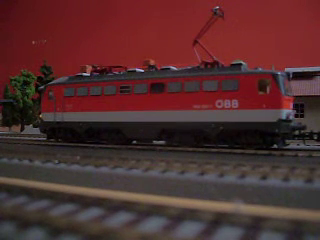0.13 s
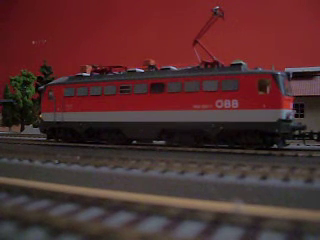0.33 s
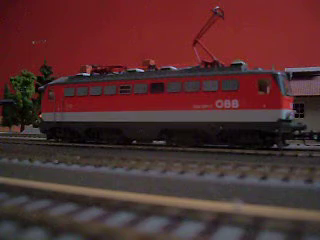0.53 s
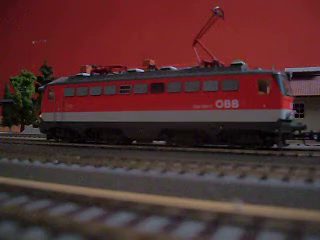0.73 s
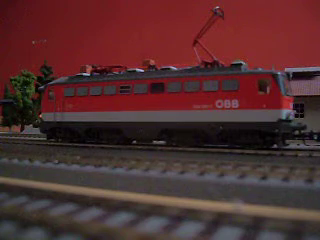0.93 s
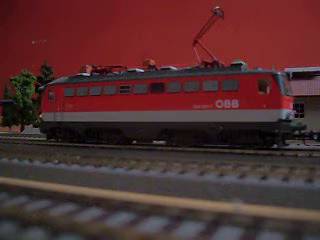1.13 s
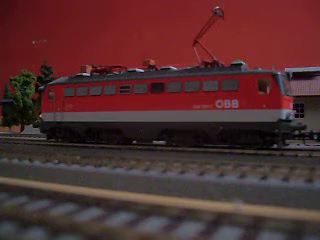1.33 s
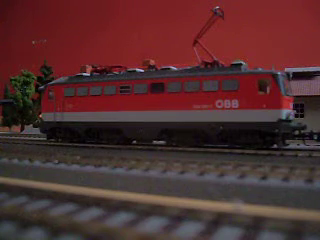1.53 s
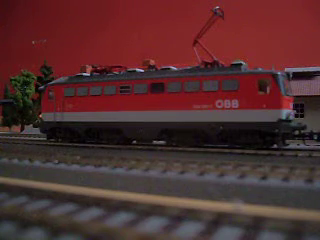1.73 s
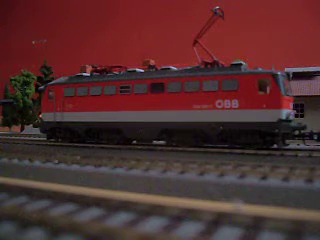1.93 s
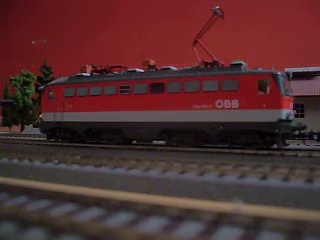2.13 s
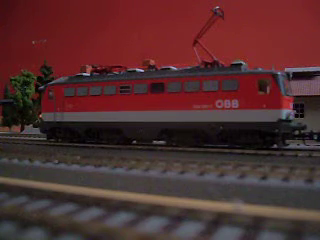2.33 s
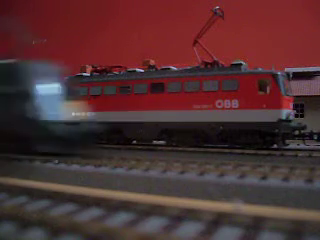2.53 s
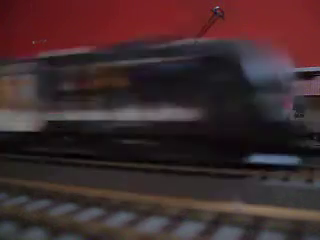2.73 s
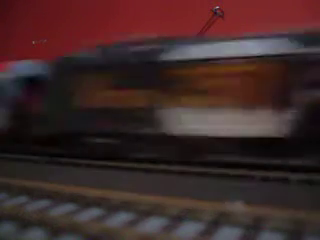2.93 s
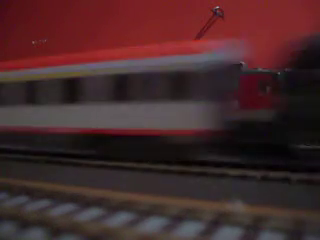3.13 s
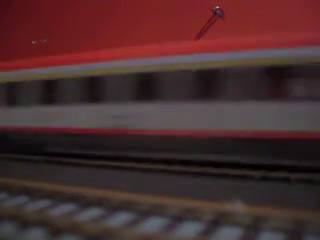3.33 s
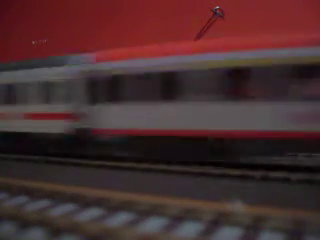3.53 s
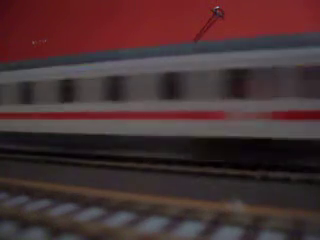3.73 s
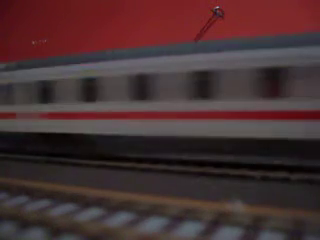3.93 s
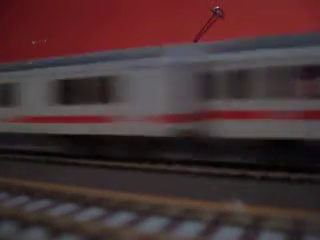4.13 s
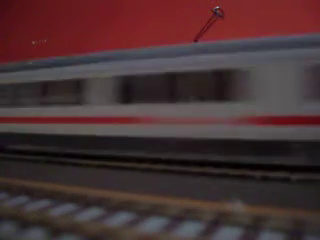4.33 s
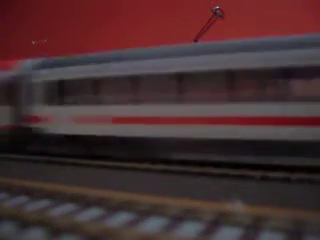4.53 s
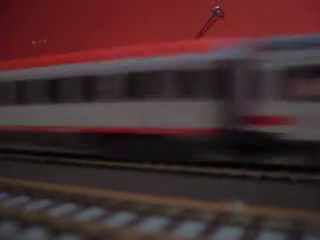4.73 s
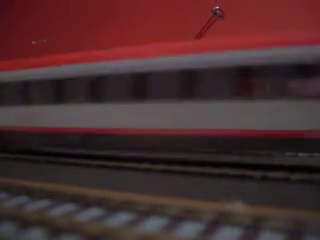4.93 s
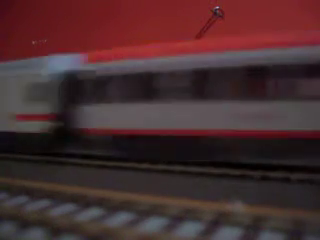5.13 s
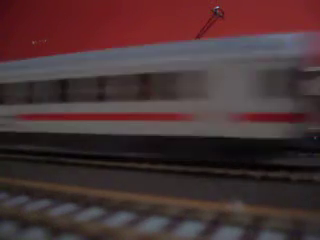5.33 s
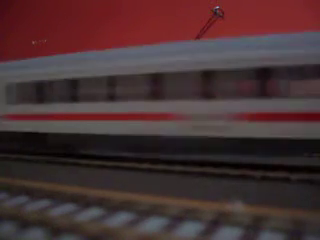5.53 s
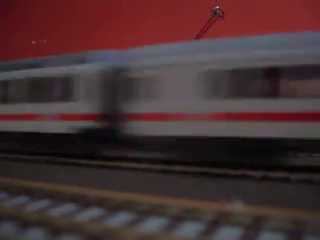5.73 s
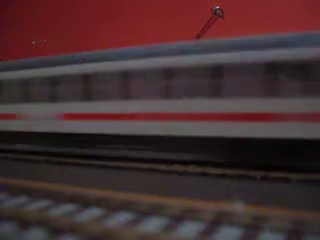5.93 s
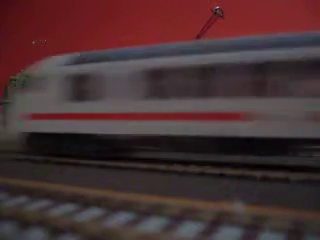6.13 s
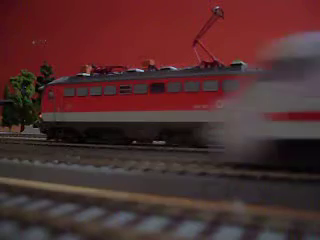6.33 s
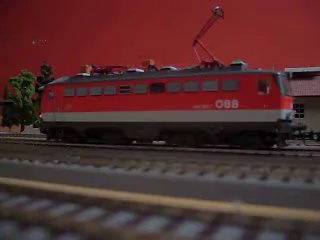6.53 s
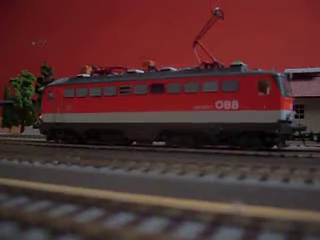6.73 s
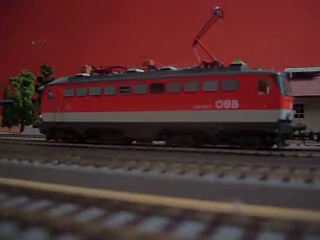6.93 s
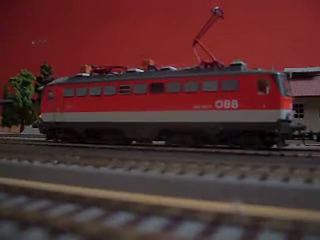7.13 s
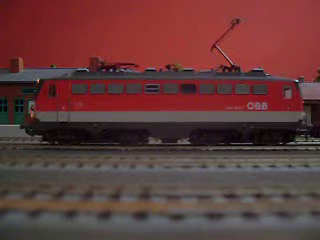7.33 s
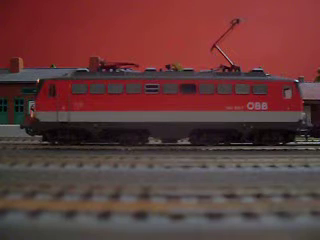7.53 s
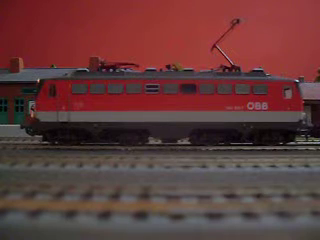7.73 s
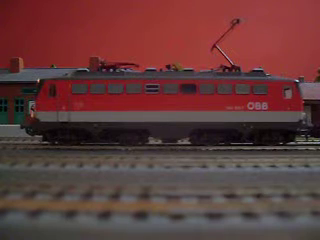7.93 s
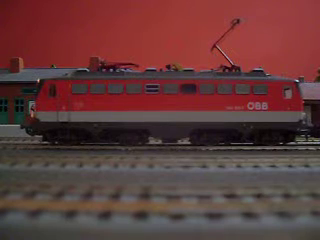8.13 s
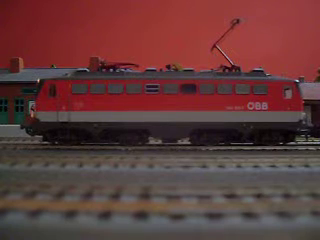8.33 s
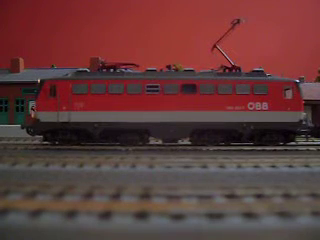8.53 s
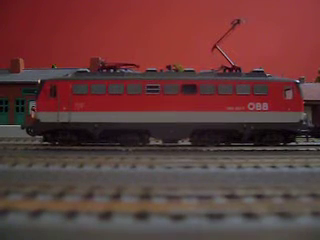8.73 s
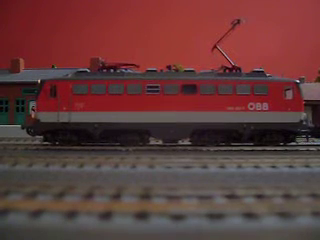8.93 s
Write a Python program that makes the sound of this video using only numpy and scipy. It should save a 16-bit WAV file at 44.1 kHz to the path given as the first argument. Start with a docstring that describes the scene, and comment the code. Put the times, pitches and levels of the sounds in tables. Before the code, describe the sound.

A model train rushes past very close with gritty wheel hiss, rail-joint clacks and ringing rails, then cuts abruptly to faint hiss and whine.

```python
"""On a model railway board, a small train rolls by a few centimetres away: rushing, gritty wheel noise, clacks
and ticks at the rail joints, ringing rails and a rumbling board. At 7.29 s the sound of the train breaks off at
once, leaving faint hiss, soft thuds and a thin electronic whine. Wheels and hiss are shaped noise; ringing
rails are narrow bands of noise; clacks, bumps and thuds are struck, quickly fading tones."""
import sys
import numpy as np
from scipy import signal
from scipy.fft import rfft, irfft
from scipy.io import wavfile

SR = 44100
rng = np.random.default_rng(int(sys.argv[2]) if len(sys.argv) > 2 else 0)


def file_out(sig):
    """Save sig as 16-bit WAV at sys.argv[1]."""
    # one column per channel
    cols = np.atleast_2d(sig).T
    # limit, then scale
    lim = np.clip(cols, -1, 1)
    pcm = np.round(lim * 32767).astype(np.int16)
    wavfile.write(sys.argv[1], SR, pcm)


N = 396900
TIME = np.arange(N) / SR
TRAIN_SOUND_ENDS_S = 7.29
# head and tail of the train go by; each wheel is near for about PASS_S
HEAD_S, TAIL_S, PASS_S = 3.42, 6.71, 0.3
# rolling noise: (steady level from afar dB, level alongside dB, fade after HEAD_S in dB per s)
# the fade follows the lighter rear of the train; other layers use the same three settings
ROLL_DB = (-49, -38.5, 1.47)

# tones of a struck metal wheel: (f/Hz before detuning, relative level/dB, time to fade by 60 dB/s)
TICK_MODES = [(6840, 1.5, 0.003), (9460, 8, 0.0024), (10560, -2, 0.0018)]
# tones of the struck board: (f/Hz, relative level/dB, time to fade by 60 dB/s)
BUMP_MODES = [(113, -15, 0.096), (194, -7, 0.033), (287, -10, 0.041), (390, -7, 0.048), (590, -2, 0.041),
              (730, -1.5, 0.051)]
# tone colour of distant rolling, also used for rustles: (f/Hz, relative level/dB per Hz)
FAR_COLOUR = [(700, -37), (1000, -9.5), (1260, -9.5), (1700, -2), (2580, -1), (3270, 2.5), (3830, -2.5),
              (5580, -3), (7900, -18.5), (9000, -28)]
# a bogie (wheel truck) crosses a rail joint, one axle after the other:
# (t/s, time between axles/s, first clack level/dB, second clack level/dB, level of each tick/dB)
BOGIES = [(3.0034, 0.0685, -28.5, -32, -43), (3.423, 0.058, -39, -31, -39.5), (3.622, 0.063, -31, -37, -41),
          (3.785, 0.057, -31, -29.5, -38), (3.9372, 0.056, -29, -30, -38), (4.1705, 0.057, -29.5, -35, -38),
          (4.2979, 0.060, -30, -31, -37), (4.465, .0515, -30, -34, -39.5), (4.7101, .0612, -35, -35, -39.5),
          (4.8746, .0558, -32, -34, -41), (5.0340, .0596, -32.5, -31.5, -38.3),
          (5.2808, 0.050, -34, -37, -41), (5.408, .0613, -32.5, -32.5, -37.5),
          (5.583, .06, -29.5, -34, -43), (5.821, .06, -33.5, -32.5, -41.5), (5.9620, 0.0592, -34, -30, -41),
          (6.1262, .0572, -29, -31.5, -39), (6.3518, 0.058, -37, -38, -41),
          (6.4915, 0.059, -33.5, -34, -41), (6.8826, .0538, -35, -38, -43.5)]


def from_db(db):
    """Turn decibels into gain."""
    return 10 ** (np.asarray(db) / 20)


def rms_one(x):
    """Scale to an average strength (rms) of 1."""
    return x / np.sqrt(np.mean(x ** 2) + 1e-20)


def in_time(rows):
    """Join the rows with straight lines and read each column at every sample."""
    s, *columns = np.transpose(rows)
    return [np.interp(TIME, s, column) for column in columns]


def colour(x, spectrum):
    """Weight the frequencies of x by a curve that falls 48 dB per octave beyond its ends; rms 1."""
    hz, db = np.transpose(spectrum)
    octave = np.log2(np.arange(N // 2 + 1) * SR / N + 1)
    points = np.log2(hz)
    beyond = np.abs(octave - np.clip(octave, points.min(), points.max()))
    gain = from_db(np.interp(octave, points, db) - 48 * beyond)
    return rms_one(irfft(rfft(x) * gain, N))


def drift(rate):
    """Smooth random wandering with about `rate` changes a second; rms 1."""
    hz = np.arange(N // 8) * SR / N
    real, imaginary = rng.standard_normal((2, len(hz)))
    return rms_one(irfft((real + 1j * imaginary) / (1 + (hz / rate) ** 2), N))


def narrow_noise(centre_hz, width_hz):
    """A tone with randomly wandering strength and phase, like a resonance kept ringing; its pitch may move."""
    phase = 2 * np.pi * np.cumsum(centre_hz * np.ones(N)) / SR
    return rms_one(drift(width_hz) * np.cos(phase) + drift(width_hz) * np.sin(phase))


def ring(force, modes):
    """A struck body: the force sets off several fading tones, each at its own level."""
    out = 0
    for k, (hz, db, t60) in enumerate(modes):
        r = np.exp(-np.log(1000) / (t60 * SR))
        w = 2 * np.pi * hz / SR
        tone = signal.lfilter([0, np.sin(w)], [1, -2 * r * np.cos(w), r * r], force + 1e-18)
        out = out + (-1) ** k * from_db(db) * tone
    return out


def blows(rows):
    """One single-sample click for each (t/s, strength/dB) row."""
    s, db = np.transpose(rows)
    return np.bincount(np.round(s * SR).astype(int), from_db(db), N)


def contact(grains_per_s, spread_db, grain_share, rattle_s):
    """Wheels on rough rail: a smooth rush plus tiny, quickly fading rattles of uneven size; rms about 1."""
    size_db = spread_db * np.minimum(rng.exponential(1, N), 4)
    energy = from_db(size_db) ** 2 * (rng.random(N) < grains_per_s / SR)
    rattles = signal.lfilter([1], [1, -np.exp(-1 / (rattle_s * SR))], energy + 1e-18)
    share = np.clip(grain_share, 0, 1)
    return np.sqrt(share * rattles / rattles.mean() + 1 - share) * rng.standard_normal(N)


def joint_hits(hits, modes, chatter_s, chatter, detune):
    """A knock and a few milliseconds of chatter set a small body ringing; no two hits are quite alike."""
    size = SR // 25
    out = np.zeros(N)
    age = np.arange(size) / SR
    # such a small body gives off no bass and little above the treble
    small_body = signal.butter(2, [480, 13000], "band", fs=SR, output="sos")
    for s, db in hits:
        force = chatter * rng.standard_normal(size) * np.exp(-age / chatter_s)
        force[0] += 1
        detuned = [(hz * np.exp(detune * rng.normal()), level, t60) for hz, level, t60 in modes]
        hit = signal.sosfilt(small_body, ring(force, detuned))
        start = round(s * SR)
        # the level is the rms the hit would have if squeezed into 1 ms
        out[start:start + size] += from_db(db) * hit / np.sqrt(np.sum(hit ** 2) / (SR / 1000))
    return out


def alongside(from_s, to_s, near_s):
    """Power, 0-1, of a row of wheels going by, each fading with the square of its distance."""
    return (np.arctan((TIME - from_s) / near_s) - np.arctan((TIME - to_s) / near_s)) / np.pi


def pass_gains(layer_db):
    """The steady gain of a layer from afar, and its gain as the train goes by."""
    far_db, near_db, fade_db_per_s = layer_db
    faded_db = near_db - fade_db_per_s * np.maximum(TIME - HEAD_S, 0)
    return from_db(far_db), from_db(faded_db) * np.sqrt(alongside(HEAD_S, TAIL_S, PASS_S))


def pass_gain(layer_db, extra=0):
    """Gain of a layer: far, near and any extra part summed in power."""
    far, near = pass_gains(layer_db)
    return np.sqrt(far ** 2 + near ** 2 + extra ** 2)


def hiss(train_on):
    """Faint shaped noise that wavers a little and swells briefly into soft rustles."""
    # tone colour: (f/Hz, relative level/dB per Hz)
    hiss_colour = [(22, -13), (100, -6.5), (200, -7), (280, -7), (430, -4.5), (600, 0), (800, 0.5),
                   (1200, -2), (2300, 0.5), (3500, -2.5), (5000, -3), (7500, -9.5), (10200, -10),
                   (12300, -31.5)]
    # faint rustles: (t/s, time from peak to 1/e of its gain/s, peak level/dB)
    rustles = [(7.33, 0.01, -65), (7.765, .025, -64), (8.07, 0.044, -61)]
    level_db = train_on * -60.5 + (1 - train_on) * -61 + 0.71 * drift(9.2)
    steady = from_db(level_db) * colour(rng.standard_normal(N), hiss_colour)
    rustle_gain = sum(from_db(db) * np.exp(-((TIME - s) / half_s) ** 2) for s, half_s, db in rustles)
    return steady + rustle_gain * colour(rng.standard_normal(N), FAR_COLOUR)


def whine(train_on):
    """A thin electronic tone whose strength and phase jump to and fro 15 times a second."""
    whine_hz, flutter_hz = 7867, 15
    switched = (TIME * flutter_hz) % 1 < .42
    phase = 2 * np.pi * whine_hz * TIME + 1.6 * switched
    pulsing = from_db(-5 * switched)
    level_db = train_on * -77 + (1 - train_on) * -73.2
    return from_db(level_db) * rms_one(np.sin(phase) * pulsing)


def dull_thuds():
    """Clicks set off the deep, dull tones of the board."""
    # thuds: (t/s, strength/dB)
    thuds = [(3.392, -51), (3.458, -56), (3.760, -52), (4.762, -53), (7.598, -61), (7.768, -61),
             (8.61, -62), (8.735, -57)]
    # tones: (f/Hz, relative level/dB, time to fade by 60 dB/s)
    thud_modes = [(105, -11.5, 0.11), (178, -3.5, 0.054), (295, -7.5, .04)]
    return ring(blows(thuds), thud_modes)


def soft_bumps(vary_db):
    """Each bump strikes the board at another spot, so its tones ring in another mix."""
    # bumps: (t/s, strength/dB before the mix varies)
    bumps = [(1.505, -57), (2.206, -49), (2.600, -49), (2.672, -50), (2.831, -52), (3.003, -47),
             (3.075, -50), (3.225, -46), (3.396, -54), (3.471, -43), (3.763, -52), (4.219, -52),
             (5.093, -61), (6.518, -51), (7.1473, -50)]
    s, db = np.transpose(bumps)
    mix_db = vary_db * rng.standard_normal((len(s), len(BUMP_MODES)))
    out = 0
    for k, mode in enumerate(BUMP_MODES):
        out = out + (-1) ** k * ring(blows(np.c_[s, db + mix_db[:, k]]), [mode])
    return out


def track_snap():
    """One sharp snap from the track: a click sets off short tones from bass to treble."""
    # snap: (t/s, strength/dB)
    snap = [(7.1466, -26)]
    # tones: (f/Hz, relative level/dB, time to fade by 60 dB/s)
    snap_modes = [(252, -23.5, 0.026), (520, -10, 0.0053), (1450, -4, 0.0037), (2800, 1, 0.0028),
                  (5900, 2.5, .003), (10500, -9.5, .002)]
    return ring(blows(snap), snap_modes)


def board(judder):
    """The board rumbles and hums under the heavy locomotive and drones under every coach."""
    # tone colours: (f/Hz, relative level/dB per Hz)
    rumble_colour = [(70, -13), (120, -3.5), (200, 1.5), (270, -1), (390, 3.5), (500, 5), (620, -29)]
    drone_colour = [(500, -10), (580, 2), (660, 0), (760, 4), (830, -2.5), (920, 2), (1080, -8),
                    (1350, -18)]
    weight = np.sqrt(alongside(2.8, 3.87, near_s=0.078))  # the locomotive on the board
    shaken = np.sqrt(alongside(BOGIES[0][0], 4.02, near_s=0.022))  # from the first bogie until it settles
    rumble_force = contact(grains_per_s=150, spread_db=0.0, grain_share=0.36, rattle_s=0.0068)
    rumble = colour(rumble_force, rumble_colour)
    drone_force = contact(grains_per_s=240, spread_db=3.0, grain_share=0.45, rattle_s=0.0014)
    drone = colour(drone_force, drone_colour) * from_db(1.47 * judder - 0.87)
    hum = narrow_noise(112, width_hz=6.9)
    # a second resonance, stirred by the distant train
    far_hum = narrow_noise(194, width_hz=9.1) * from_db(-84.5 + 2 * drift(4.3))
    return (rumble * pass_gain((-75, -73, 0), from_db(-67) * weight)
            + drone * pass_gain((-67.5, -54.5, 0.53), from_db(-56) * weight)
            + hum * pass_gain((-92, -82.5, -0.5), from_db(-76.5) * shaken)
            + far_hum)


def singing_track():
    """A broad ring of the rails that sinks as the train leaves, with swells and passing resonances."""
    # swells: (t/s, time from peak to 1/e of its power/s, peak level/dB, f/Hz)
    swells = [(3.58, 0.059, -46, 3580), (4.062, 0.077, -45, 3806), (4.851, 0.038, -46, 4230),
              (5.212, 0.043, -46, 4720), (5.41, 0.044, -45, 4110), (5.621, 0.13, -51, 3590),
              (6.215, 0.1, -48.5, 3600), (6.305, .04, -42, 4000), (6.67, 0.089, -48.5, 3680)]
    # wheels, track and board resonate for a while: (from t/s, to t/s, f/Hz, width/Hz, level/dB)
    rail_rings = [(2.78, 6.95, 9960, 630, -64.5), (2.99, 3.2, 392, 25, -64), (3.0, 3.28, 193.4, 14, -67.5),
                  (3.68, 4.0, 110.5, 6.4, -72), (3.73, 3.86, 2056, 320, -47.5),
                  (3.93, 4.11, 2290, 420, -50), (5.95, 6.56, 700, 140, -62.5), (5.85, 6.33, 5755, 245, -56),
                  (6.55, 7.1, 6740, 324, -59), (7.08, 7.35, 2003, 360, -54.5)]
    sing_hz, sag_from_s, sag_hz_per_s = 3695, 6.7, 950
    centre_hz = sing_hz - sag_hz_per_s * np.maximum(TIME - sag_from_s, 0)
    sing_gain = from_db(-51) * np.sqrt(alongside(5.46, 7.4, near_s=0.066))
    out = sing_gain * narrow_noise(centre_hz, width_hz=480)
    power = sum(from_db(db) ** 2 * np.exp(-((TIME - s) / half_s) ** 2) for s, half_s, db, _ in swells)
    swell_hz, = in_time([(s, hz) for s, _, _, hz in swells])
    out += np.sqrt(power) * narrow_noise(swell_hz, width_hz=460)
    for from_s, to_s, hz, width_hz, db in rail_rings:
        gain = from_db(db) * np.sqrt(alongside(from_s, to_s, near_s=0.013))
        out += gain * narrow_noise(hz, width_hz)
    return out


def bogie_ring():
    """The bogie frames ring in the low treble; pitch and strength shift as one after another rolls by."""
    far, near = pass_gains(ROLL_DB)
    centre_hz = 2080 * np.exp(0.1 * drift(4))  # wanders by about a tenth
    strength = from_db(-12 + 0.89 * drift(19))  # against the nearby rolling noise
    return near * strength * narrow_noise(centre_hz, width_hz=150)


def stray_ticks(count):
    """Wheel flanges touch the rail lightly at random times, louder while the train is near."""
    near_db = 10 * np.log10(alongside(HEAD_S, TAIL_S, PASS_S))
    touches = []
    for s, weakness in rng.random((count, 2)) * [TRAIN_SOUND_ENDS_S, 1]:
        touches.append((s, -44.5 + 0.63 * near_db[round(s * SR)] - 6 * weakness))
    return joint_hits(touches, TICK_MODES, chatter_s=0.0012, chatter=0.27, detune=0.028)


def rail_joints():
    """Every axle gives a clack of the bogie, a bright tick of the metal wheel and a faint thump of the board."""
    # tones of the bogie: (f/Hz before detuning, relative level/dB, time to fade by 60 dB/s)
    clack_modes = [(730, -19.5, 0.018), (1680, -2.5, 0.0069), (2190, 0.5, 0.0067), (3750, -1.5, 0.0012),
                   (5430, -0.5, 0.0031)]
    # a single wheel knocks on the track: (t/s, clack level/dB, tick level/dB)
    knocks = [(1.426, -44, -56), (2.2085, -37, -51), (2.428, -47, -48), (2.672, -39, -49),
              (3.2537, -34, -52), (3.3965, -41, -47), (3.4652, -44, -41), (3.8702, -31, -42),
              (3.8865, -39, -43), (4.387, -30, -41), (4.9254, -29.5, -38), (5.177, -36, -43),
              (5.2061, -37, -43), (5.3932, -40, -45), (5.4208, -37, -50), (5.4376, -35, -43),
              (5.4988, -38, -49), (5.7275, -45, -43), (5.7873, -33, -44), (5.991, -31.5, -45),
              (6.049, -42, -42), (6.5144, -32, -40)]
    hits = []
    for s, axle_s, first_db, second_db, tick_db in BOGIES:
        hits.append((s, first_db, tick_db))
        hits.append((s + axle_s, second_db, tick_db))
    hits += list(knocks)
    clacks = [(s, db) for s, db, _ in hits]
    ticks = [(s, db) for s, _, db in hits]
    clack = joint_hits(clacks, clack_modes, chatter_s=0.0032, chatter=0.16, detune=0.084)
    tick = joint_hits(ticks, TICK_MODES, chatter_s=0.0022, chatter=0.34, detune=0.032)
    thump = from_db(-26.5) * ring(blows(clacks), BUMP_MODES)
    return clack + tick + thump


def locomotive_hiss():
    """The driven wheels of the locomotive, a smooth hiss heard ahead of the coaches."""
    # tone colour: (f/Hz, relative level/dB per Hz)
    locomotive_colour = [(2300, -8), (3800, -1), (5500, -1), (7200, -9), (9000, -21)]
    gain = from_db(-50.5) * np.sqrt(alongside(2.6, HEAD_S, near_s=0.048))
    return gain * colour(rng.standard_normal(N), locomotive_colour)


def short_reflection(direct):
    """Subtract a very short echo: it hollows out the sound, and its shrinking delay makes the colour rise."""
    share = 0.13 * np.clip((TIME - 4.3) / (6.6 - 4.3), 0, 1)  # grows from 4.3 s to 6.6 s
    delay_s = 0.000386 - 0.000025 * (TIME - TAIL_S)
    return direct - share * np.interp(TIME - delay_s, TIME, direct)


def wheels(judder):
    """Rolling noise: smooth from afar, grainy and sizzling close by."""
    # tone colours: (f/Hz, relative level/dB per Hz)
    near_colour = [(1000, -15), (1270, -8), (1670, -0.5), (2110, 1.5), (2700, -2), (4000, 0), (4430, -1.5),
                   (6000, -4.5), (7770, -15), (9000, -18)]
    sizzle_colour = [(6500, -19), (7800, -11), (8700, -5.5), (9600, -1.5), (10400, -7), (11200, -14),
                     (12200, -35), (13000, -53)]
    far, near = pass_gains(ROLL_DB)
    near_force = contact(grains_per_s=1400, spread_db=2.0, grain_share=0.43, rattle_s=0.00096)
    far_force = contact(grains_per_s=690, spread_db=3.5, grain_share=0.24, rattle_s=0.0017)
    grit = contact(grains_per_s=240, spread_db=3.0, grain_share=0.25, rattle_s=0.00051)
    far_roll = colour(far_force, FAR_COLOUR) * from_db(0.5 * judder + 0.1)
    near_roll = colour(near_force, near_colour) * from_db(0.79 * judder + 0.17)
    sizzle = colour(grit, sizzle_colour) * from_db(0.33 * judder)
    rolling = far * far_roll + near * near_roll + pass_gain((-72, -56.5, 2)) * sizzle
    return short_reflection(rolling + locomotive_hiss())


def scene():
    """The passing train, whose sound breaks off at once, over thuds, hiss and whine that go on."""
    train_on = np.clip((TRAIN_SOUND_ENDS_S - TIME) / 0.0014 + 1, 0, 1)  # 1, then down to 0 within 1.4 ms
    judder = drift(24)  # the wheel load shakes rolling noise and board drone together
    background = hiss(train_on) + whine(train_on) + dull_thuds()
    train = soft_bumps(vary_db=2.5) + track_snap() + board(judder) + singing_track() + bogie_ring()
    train += stray_ticks(count=140) + rail_joints() + wheels(judder)
    return (background + train_on * train)[None]


def record(dry):
    """A small microphone with no top octave: a steep filter takes away all above 12.4 kHz."""
    return signal.sosfilt(signal.ellip(10, .2, 70, 12400, fs=SR, output="sos"), dry)


dry = scene()
out = record(dry)
file_out(out)
```